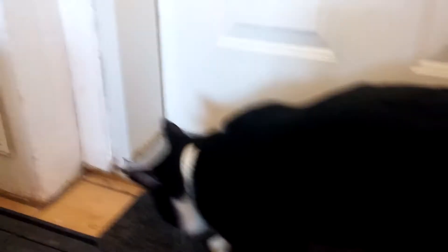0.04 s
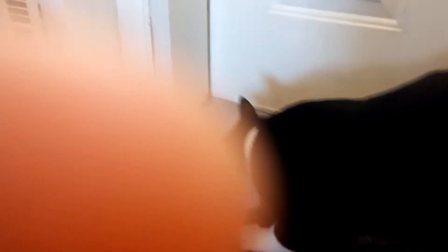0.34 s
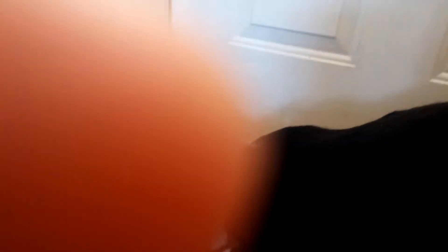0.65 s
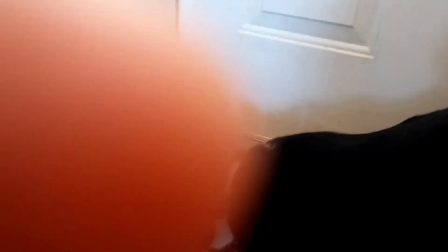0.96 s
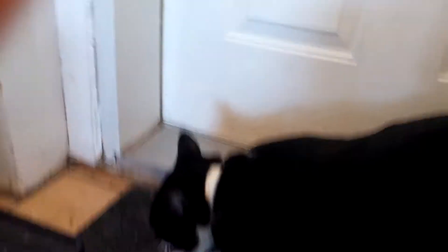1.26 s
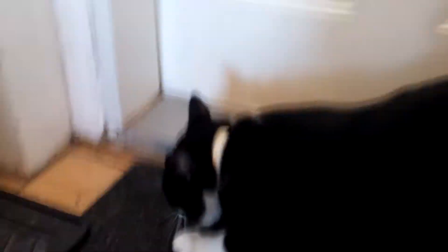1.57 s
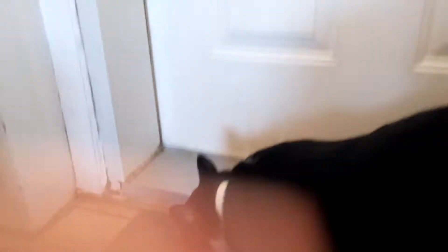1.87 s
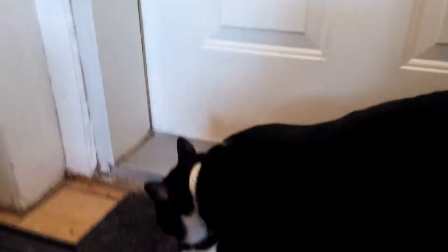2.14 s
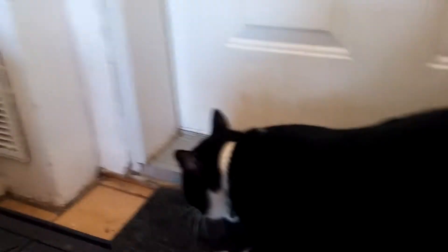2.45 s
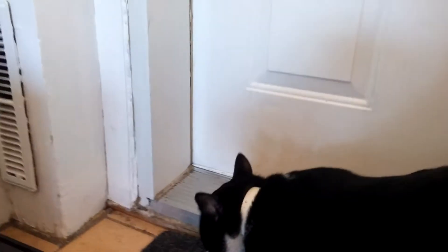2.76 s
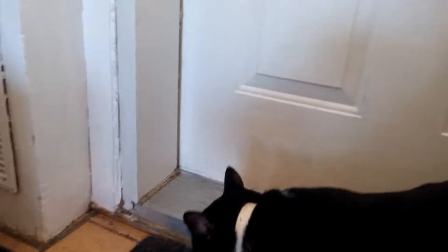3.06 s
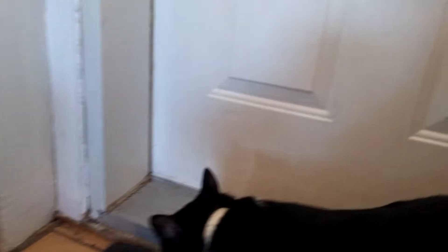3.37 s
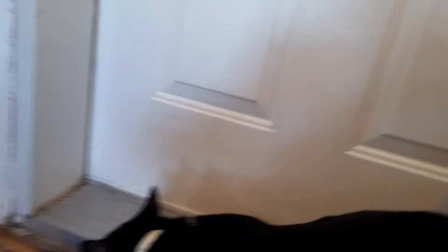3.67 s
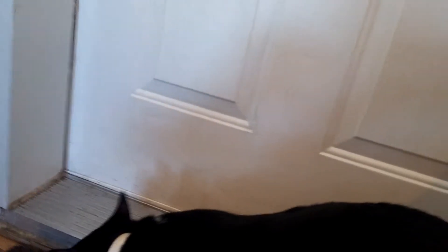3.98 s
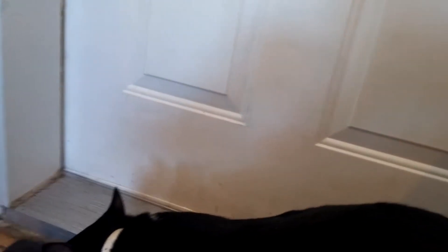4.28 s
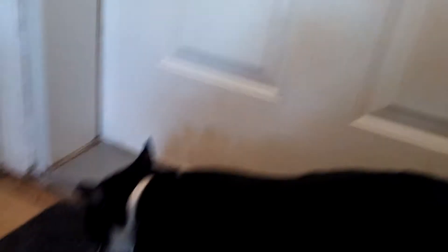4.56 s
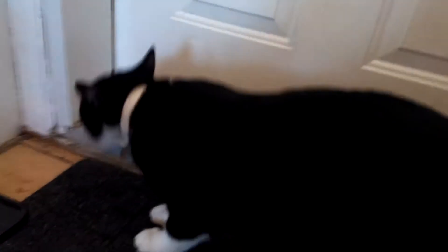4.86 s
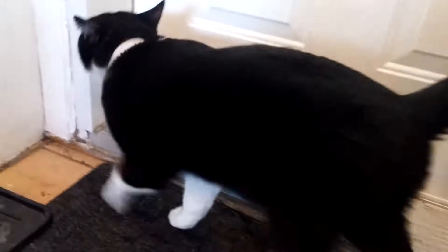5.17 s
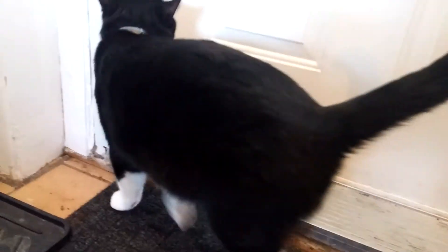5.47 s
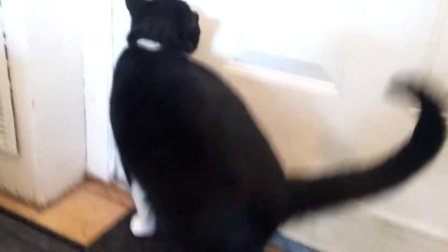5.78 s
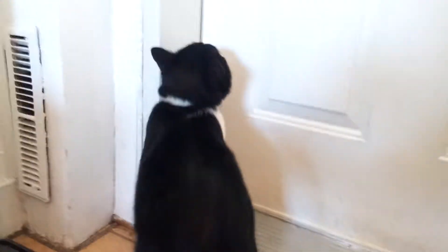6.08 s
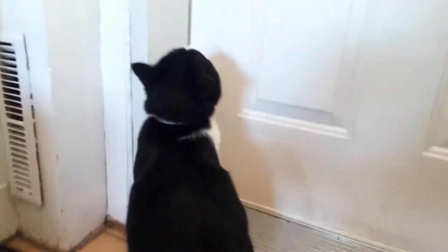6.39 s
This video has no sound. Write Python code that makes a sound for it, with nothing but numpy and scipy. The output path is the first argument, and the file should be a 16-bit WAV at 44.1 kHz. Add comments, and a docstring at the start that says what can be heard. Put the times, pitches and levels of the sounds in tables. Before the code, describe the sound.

In a quiet hallway with a short echo, a cat pats, pushes and scratches a closed door for about three seconds, making irregular bursts of sharp knocks, scrapes and little rattles. Before it, fingers tick and rub on the handheld microphone. Afterwards there is only faint room air and a low electrical hum, until a few close clicks and a low bump on the left microphone finish it.

```python
"""Cat pawing at a door

A cat paws and claws at a closed panel door in a bare hallway; the door knocks and chatters in its frame.
Fingers shift on the handheld recorder: they tick on the case, rub the microphone openings (ports) and
plug the left one. Mains hum and a thin whine lie below, a faint high hiss comes and goes near the end,
and a noise suppressor turns the quiet moments down."""
import sys
import numpy as np
from scipy import signal
from scipy.fft import rfft, irfft
from scipy.io import wavfile
from scipy.ndimage import uniform_filter1d, minimum_filter1d

SR = 44100
rng = np.random.default_rng(int(sys.argv[2]) if len(sys.argv) > 2 else 0)


def unload_audio(sound):
    """Save the sound as a 16-bit wav file, at the path given as the first command line argument."""
    columns = np.transpose(np.atleast_2d(sound))
    # keep every value between -1 and 1, then stretch to whole-number steps
    steps = np.round(np.clip(columns, -1, 1) * 32767)
    wavfile.write(sys.argv[1], SR, steps.astype(np.int16))


N = 288016
TIME = np.arange(N) / SR
PORT_HZ, PORT_WIDTH_HZ = 4040, 100   # the hollow behind each microphone port rings here

# How the hallway echoes; a fade is the time to drop 60 dB, likeness is how alike left and right are.
# pitch_hz, early_echo_db, late_echo_db, fade_s, likeness
HALLWAY_ECHO = [(60, -1.5, -2, 0.33, 1), (250, -0.5, -9, 0.39, 0.94), (603, 1, -5, 0.26, 0.3),
                (1100, -4, -9, 0.49, 0.08), (2230, 5, -7.5, 0.7, -0.22), (5000, 5.5, -9, 0.31, 0.15),
                (15000, -5, -9.5, 0.73, 0.2)]


def from_db(db):
    """Turn decibels into a gain."""
    return 10 ** (np.asarray(db) / 20)


def rms_one(x):
    """Scale a signal to an average strength (rms) of 1."""
    return x / np.sqrt(np.mean(x ** 2) + 1e-20)


def pan(balance_db):
    """Left and right gains; a positive balance leans left."""
    return from_db([[balance_db / 2], [-balance_db / 2]])


def at_hz(points, hz, column=1):
    """Read one column of a table at any pitch, gliding between its rows."""
    table = np.array(points)
    return np.interp(np.log(hz + 1e-9), np.log(table[:, 0]), table[:, column])


def butter(x, hz, kind, order=2):
    """Keep the lows, the highs or one band."""
    sections = signal.butter(order, np.clip(hz, 10, .45 * SR), kind, fs=SR, output="sos")
    return signal.sosfilt(sections, x)


def resonate(x, hz, width_hz):
    """Ring at one pitch; the narrower the width, the longer the ring."""
    r = np.exp(-np.pi * width_hz / SR)
    feedback = [1, -2 * r * np.cos(2 * np.pi * hz / SR), r * r]
    return signal.lfilter(np.array([1, 0, -1]) * (1 - r * r) / 2, feedback, x + 1e-18)


def noise(spectrum):
    """Noise with the given tone colour."""
    gains = from_db(at_hz(spectrum, np.fft.rfftfreq(N, 1 / SR)))
    return rms_one(irfft(rfft(rng.standard_normal(N)) * gains, N))


def spread(mid, side, likeness):
    """Two unrelated signals become a left and right that are partly alike."""
    alike = np.clip(likeness, -.99, .99)
    return np.sqrt((1 + alike) / 2) * mid + np.sqrt((1 - alike) / 2) * side * np.array([[1], [-1]])


def add(out, start_s, sound):
    """Mix a short sound in at its start time."""
    i = round(start_s * SR)
    out[..., i:i + sound.shape[-1]] += sound[..., :N - i]


def contact(length_s, push=2.6, grain_db=4.5, grip_s=0.00023, size=4096):
    """The force of a touch: a first push, then uneven slips that take hold and die away."""
    t = np.arange(size) / SR
    slips = rms_one(rng.standard_normal(size) * from_db(grain_db * rng.standard_normal(size)))
    force = slips * (1 - np.exp(-t / grip_s)) * np.exp(-t / max(length_s, 1e-4))
    force[0] += push
    return force


def vibrate(force, resonances):
    """A force shakes all of an object's resonances at once; every second one is flipped."""
    return sum((-1) ** k * from_db(db) * resonate(force, hz, width_hz)
               for k, (hz, width_hz, db) in enumerate(resonances))


def set_hardness(x, levels_db):
    """Make a touch hard or soft: thud, knock, rasp and click each get a level, as if lasting 10 ms."""
    # The four ranges, from thud up to click: low_hz, high_hz
    ranges = [(40, 620), (730, 1450), (1650, 3300), (3800, 19500)]
    parts = [butter(x, edges, "band") for edges in ranges]
    return sum(from_db(db) * part / np.sqrt(np.sum(part ** 2) / (.01 * SR))
               for db, part in zip(levels_db, parts))


def air_and_hum(air_db=-60.5, hum_hz=120, whine_hz=1609, waver_db=0.15, waver_hz=4, change_s=(4.8, 5.4)):
    """Still room air, a mains hum that eases and a thin appliance whine that grows."""
    # Tone colour of the air: pitch_hz, level_db
    air_colour = [(15, -45), (25, -1), (123, -8), (149, -14), (354, -21), (545, -20), (695, -20),
                  (1440, -24), (1560, -21), (1700, -23), (2410, -25.5), (4370, -31.5), (14400, -33.5),
                  (16000, -34)]
    # How alike the air is on the left and right: pitch_hz, likeness
    air_likeness = [(60, 0.44), (130, 0.16), (300, 0.03), (650, 0.047), (1400, 0)]
    # The hum, then the whine: first_db, later_db, balance_db
    tones = [(-65, -70.5, -1.5), (-84.5, -74, 17)]
    likeness = at_hz(air_likeness, np.fft.rfftfreq(N, 1 / SR))
    air = irfft(spread(rfft(noise(air_colour)), rfft(noise(air_colour)), likeness), N)
    out = from_db(air_db) * butter(air, hz=50, kind="high")
    for hz, (first_db, later_db, balance_db) in zip((hum_hz, whine_hz), tones):
        waver = waver_db * rms_one(butter(rng.standard_normal(N), waver_hz, "low"))
        level = from_db(np.interp(TIME, change_s, [first_db, later_db]) + waver)
        out = out + pan(balance_db) * level * np.sqrt(2) * np.sin(2 * np.pi * hz * TIME)
    return out


def case_ticks(length_s=0.00071, ping_db=9.0, colour_db=(-2, 0, 3.5, -1.5)):
    """Dry little ticks reach each microphone by their own path through the case and ping its port."""
    # Fingers tapping the case: start_s, level_db, sharpness_db, balance_db
    taps = [(0.374, -50, -0.5, 6), (0.497, -58, -3, 11), (0.815, -56.5, -4.5, 20), (0.94, -63.5, 0.5, 4),
            (1.107, -47.5, 5, 13), (1.133, -63, -5, 0), (1.708, -48, -1.5, 2), (2.3141, -61, 9, 4.5),
            (6.252, -50.5, 4.5, 9), (6.304, -51.5, -9.5, 9), (6.333, -53, -4.5, 27),
            (6.371, -51.5, -5.5, 11), (6.4037, -36.5, 2.5, 13.5), (6.409, -48.5, -16, 25),
            (6.4177, -38.5, -4, 28)]
    # Resonances of the case: pitch_hz, width_hz, level_db
    case_body = [(530, 520, 2), (1320, 440, -17), (1844, 1300, 7), (4060, 220, -3), (9190, 38000, -21)]
    tilt = np.array([-1, -.3, .3, 1])   # a sharper tick has less thud and more click
    out = np.zeros((2, N))
    for start_s, db, sharpness_db, balance_db in taps:
        levels_db = db + sharpness_db * tilt + colour_db
        tick = [set_hardness(vibrate(contact(length_s), case_body), levels_db) for port in range(2)]
        add(out, start_s, rms_one(pan(balance_db)) * np.array(tick))
    return out + from_db(ping_db) * resonate(out, PORT_HZ, PORT_WIDTH_HZ)


def finger_rub(roundness=1.38, stick_db=1.0, stick_hz=120):
    """Skin hisses and rumbles on one port as the pressure swells and eases; a little reaches the other."""
    # Finger slides: peak_s, hiss_db, rise_s, fall_s, rumble_over_hiss_db, balance_db
    slides = [(1.507, -58.5, 0.017, 0.047, -2.5, -9), (1.658, -44, 0.06, 0.042, -12, -19),
              (1.828, -29.5, 0.018, 0.0092, -3, -25), (1.86, -49, 0.11, 0.035, 5.5, -12),
              (3.785, -45, .012, .02, 7, 9.5), (6.409, -45, 0.0031, .025, 12.5, 18),
              (6.46, -58.5, 0.024, .09, 5, 8)]
    # Tone colour of the skin's hiss: pitch_hz, level_db
    hiss_colour = [(1500, -20.5), (3000, -8.5), (5000, -4), (8000, -2), (10000, 3), (12000, -9.5),
                   (16000, -15)]
    # Tone colour of its rumble: pitch_hz, level_db
    rumble_colour = [(25, -12), (70, -1), (200, -6), (500, -13), (1500, -21), (3000, -23), (6000, -34)]
    grip = from_db(stick_db * rms_one(butter(rng.standard_normal(N), stick_hz, "low")))
    hiss, rumble = (np.array([noise(colour), noise(colour)]) for colour in (hiss_colour, rumble_colour))
    out = 0
    for peak_s, db, rise_s, fall_s, rumble_db, balance_db in slides:
        from_peak = np.abs(TIME - peak_s) / np.where(TIME < peak_s, rise_s, fall_s)
        pressure = np.exp(-np.minimum(from_peak, 20) ** roundness)
        ports = pan(balance_db) / pan(balance_db).max()
        out = out + ports * from_db(db) * pressure * (hiss + from_db(rumble_db) * rumble)
    return grip * out


def paw_strokes(push_s=.0015, pad_s=.004):
    """The cat pushes, claws and pats the door. Each stroke is (start_s, four levels_db, length_s)."""
    # The paw pushes the door against its frame: start_s, level_db, extra_thud_db
    pushes = [(2.003, -48, -1), (2.11, -29, -8), (2.461, -27, -3.5), (2.512, -21.5, -11), (2.6135, -31, -9),
              (2.642, -39.5, 3.5), (2.7885, -49.5, -0.5), (3.36, -40.5, -9), (3.5074, -27, -6.5),
              (3.5182, -19.5, -7), (3.8249, -25.5, -12.5), (4.255, -53, -5), (4.464, -24.5, 1),
              (4.4789, -24, -17.5), (4.5659, -37.5, -11), (4.602, -45, -18), (4.6369, -43.5, -24)]
    # A claw catches and scrapes: start_s, level_db, extra_thud_db, length_s
    claws = [(1.902, -40, -1.5, 0.0038), (2.018, -48, -7, 0.0032), (2.0867, -35.5, -12, 0.0037),
             (2.102, -34.5, 4.5, 0.0012), (2.121, -30, -7.5, 0.0073), (2.898, -29, -1.5, 0.0042),
             (2.931, -38, -14, 0.00097), (3.109, -47.5, -3, 0.0026), (3.204, -55.5, -7.5, 0.0028),
             (3.282, -57, 5.5, .005), (3.332, -40, -8, .004), (3.795, -35, -10, 0.0038),
             (3.976, -33, -4.5, 0.0056), (4.3029, -35.5, -1, .0022), (4.455, -45, 4, 0.0056)]
    # The soft pad lands: start_s, level_db
    pads = [(1.81, -41.5), (1.892, -41), (2.445, -43), (3.537, -26.5), (3.756, -43.5)]
    # Each kind of touch has its own hardness: thud_db, knock_db, rasp_db, click_db
    push_db, claw_db, pad_db = (-0.1, 0.04, -6, -12), (0.65, 1.1, 0.54, -3.5), (-0.4, -22, -17, -24)
    thud = np.array([1, 0, 0, 0])
    knocks = [(s, db + extra_db * thud + push_db, push_s) for s, db, extra_db in pushes]
    scratches = [(s, db + extra_db * thud + claw_db, length_s) for s, db, extra_db, length_s in claws]
    pats = [(s, db + np.array(pad_db), pad_s) for s, db in pads]
    return knocks + scratches + pats


def door(ring_db=-46.0, size=16384):
    """Every stroke gives a short knock of the whole door and sets its panels ringing."""
    # Broad resonances of the whole door: pitch_hz, width_hz, level_db
    door_body = [(74, 24, 0), (303, 350, 0.5), (955, 210, 6), (1139, 276, 5.5), (2420, 1600, -6.5),
                 (4273, 1730, -8.5), (9500, 2000, -18), (14900, 6700, -18.5)]
    # Ringing notes of its panels: pitch_hz, level_db, fade_s
    panel_notes = [(68.4, -9.5, .13), (182, -13, 0.085), (295, -14, .14), (698, -7.5, .28), (912, -3, .13),
                   (1014, -17.5, 0.13), (1145, -10.5, 0.14), (1190, -18.5, 0.16), (1313, -10, .18),
                   (1455, -9.5, .18), (1940, -8, .2), (2380, 0, 0.067), (2780, -11, 0.29),
                   (3300, -10.5, .22)]
    knocks = np.zeros((2, N))
    for start_s, levels_db, length_s in paw_strokes() + door_chatter():
        knock = set_hardness(vibrate(contact(length_s), door_body), levels_db)
        add(knocks, start_s, early_echoes(knock))
    t = np.arange(size) / SR
    panels = sum(from_db(db - 60 * t / fade_s) * np.cos(2 * np.pi * hz * t)
                 for hz, db, fade_s in panel_notes)
    return knocks + from_db(ring_db) * signal.fftconvolve(knocks, panels[None], axes=1)[:, :N]


def early_echoes(x, fade_s=0.12, first_wall_s=0.0016, lag_s=.00003, direct_db=(1.6, -1.2), size=4096):
    """The direct sound, later and weaker on the right, plus quick wall echoes, new for each stroke."""
    t, hz = np.arange(size) / SR, np.fft.rfftfreq(size, 1 / SR)
    likeness = at_hz(HALLWAY_ECHO, hz, column=4)
    colour = spread(*rfft(rng.standard_normal((2, size))), likeness) * from_db(at_hz(HALLWAY_ECHO, hz))
    fade = rms_one(from_db(-60 * t / fade_s) * (t > first_wall_s))
    response = irfft(colour, size) * fade / np.sqrt(size)
    response[[0, 1], [0, round(lag_s * SR)]] += from_db(direct_db)
    return signal.fftconvolve(x[None], response, axes=1)


def late_echo(x, build_s=0.0041, bands=20):
    """In each band the hallway stores the energy it is fed and lets it die away as smooth noise."""
    edges_hz = np.geomspace(50, 18000, bands + 1)
    white = rng.standard_normal((2, 2, N))
    fed = x.mean(axis=0) + 1e-12 * white[0, 0]
    build = np.exp(-1 / (build_s * SR))
    out = 0
    for k, band in enumerate(zip(edges_hz, edges_hz[1:])):
        hz = np.sqrt(band[0] * band[1])
        level_db, fade_s, likeness = (at_hz(HALLWAY_ECHO, hz, column) for column in (2, 3, 4))
        kept = from_db(-60 / (fade_s * SR)) ** 2   # share of the energy left after one sample
        power = butter(fed, band, "band") ** 2
        energy = signal.lfilter([(1 - kept) * (1 - build)], np.poly([kept, build]), power)
        wash = spread(*rms_one(butter(white[k % 2], band, "band")), likeness)
        out = out + from_db(level_db) * np.sqrt(np.abs(energy)) * wash
    return out


def door_chatter(gap_s=.012, uneven_db=4.5, colour_db=(-12, 0, -7, -15), length_s=0.00028):
    """The loose door bounces in its frame: a list of small, uneven strokes."""
    # Spells of chatter: start_s, end_s, level_db
    spells = [(2.54, 2.696, -62), (3.839, 3.93, -56.5), (4.497, 4.543, -55.5)]
    bounces = []
    for start_s, end_s, level_db in spells:
        times = start_s + np.cumsum(gap_s * (.5 + rng.random(size=40)))
        levels = level_db + uneven_db * rng.standard_normal(size=40)
        bounces += [(s, db + np.array(colour_db), length_s) for s, db in zip(times, levels) if s < end_s]
    return bounces


def port_thumps(soft_hz=1900, ping_db=-3.5, leak_db=-49.0):
    """A jump in trapped air pressure swings the left microphone's bass filter and pings its port."""
    # A fingertip plugs the left port: start_s, pressure_step_db
    plugs = [(3.536, -3.5), (3.7735, -1.5), (6.4318, -7.5)]
    pressure = sum(from_db(db) * (TIME >= s) for s, db in plugs) + 1e-9 * rng.standard_normal(N)
    for hz, q in ((53, 2.5), (84, .85)):   # two bass cuts; a higher q swings for longer
        w = 2 * np.pi * hz
        pressure = signal.lfilter(*signal.bilinear([1, 0, 0], [1, w / q, w * w], SR), pressure)
    ping = from_db(ping_db) * resonate(pressure, PORT_HZ, PORT_WIDTH_HZ)
    thump = butter(pressure, soft_hz, "low", order=1) + ping
    return np.array([thump, from_db(leak_db) * thump])


def faint_high_hiss(lowest_hz=11000):
    """A faint, very high hiss swells and fades near the end."""
    # Loudness of the hiss over time: time_s, level_db
    swell = [(5.7, -100), (5.85, -58), (6.08, -58), (6.15, -100)]
    level = from_db(np.interp(TIME, *np.transpose(swell)))
    return level * butter(rng.standard_normal((2, N)), lowest_hz, "high")


def scene(door_db=-1.0, door_echo_db=-2.0, tick_echo_db=-7, door_balance_db=2.0):
    """The door sounds in the hallway; the fingers are right at the microphones."""
    knocks = from_db(door_db) * door()
    ticks = case_ticks()
    echo = late_echo(from_db(door_echo_db) * knocks + from_db(tick_echo_db) * ticks)
    handling = ticks + finger_rub() + port_thumps()
    return pan(door_balance_db) * (knocks + echo) + faint_high_hiss() + handling + air_and_hum()


def noise_suppressor(x, threshold_db=-39.0, depth_db=10.0, knee_db=19.5, hold_s=0.044, glide_s=.012):
    """Opens at once for a loud sound and turns down soon after it fades."""
    power = uniform_filter1d(np.mean(x ** 2, axis=0), size=256)
    level_db = 10 * np.log10(np.abs(power) + 1e-12)
    closed = np.clip((threshold_db - level_db) / knee_db, 0, 1)   # 0 is open, 1 is fully turned down
    half_hold = int(hold_s * SR / 2)
    held = minimum_filter1d(closed, 2 * half_hold + 1, origin=half_hold)
    eased = uniform_filter1d(held, int(glide_s * SR) + 1)
    return x * from_db(-depth_db * np.minimum(closed, eased))


def record(dry, cutoff_hz=16200):
    """The recorder turns quiet moments down and cuts the highest treble."""
    treble_cut = signal.ellip(10, .3, 70, cutoff_hz, fs=SR, output="sos")
    return signal.sosfilt(treble_cut, noise_suppressor(dry))


dry = scene()
out = record(dry)
unload_audio(out)
```